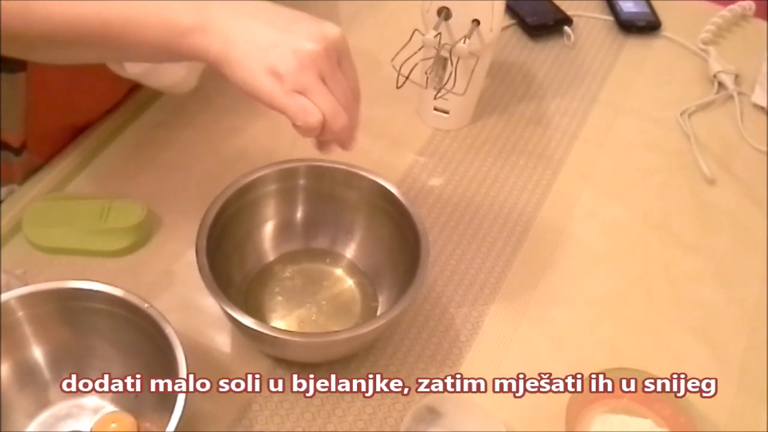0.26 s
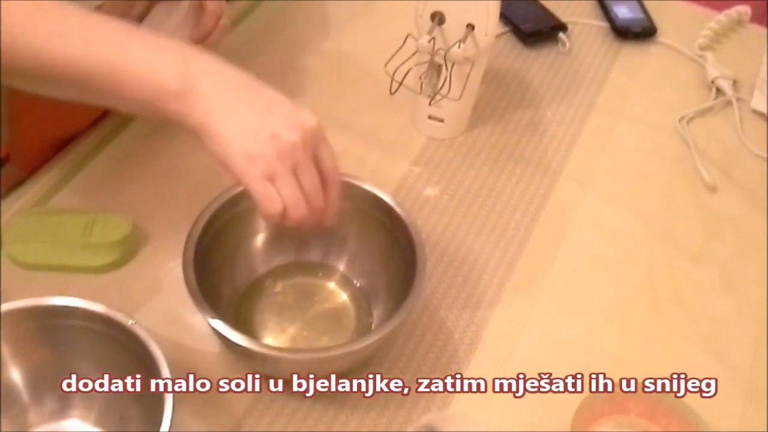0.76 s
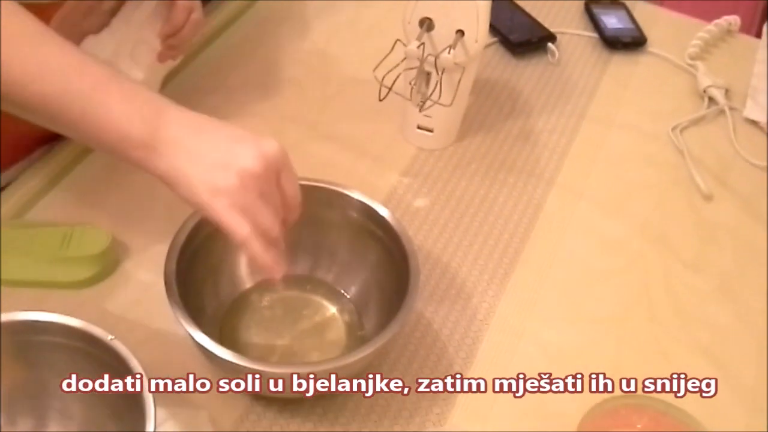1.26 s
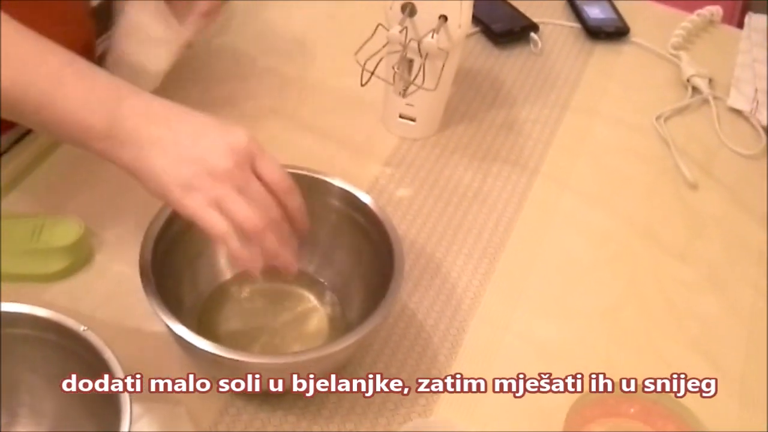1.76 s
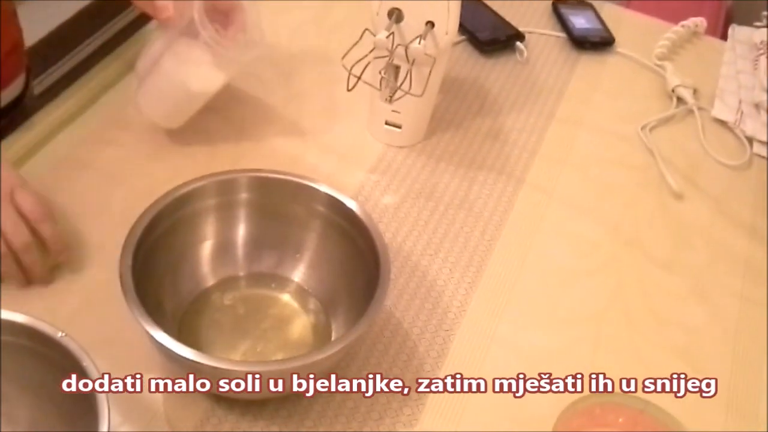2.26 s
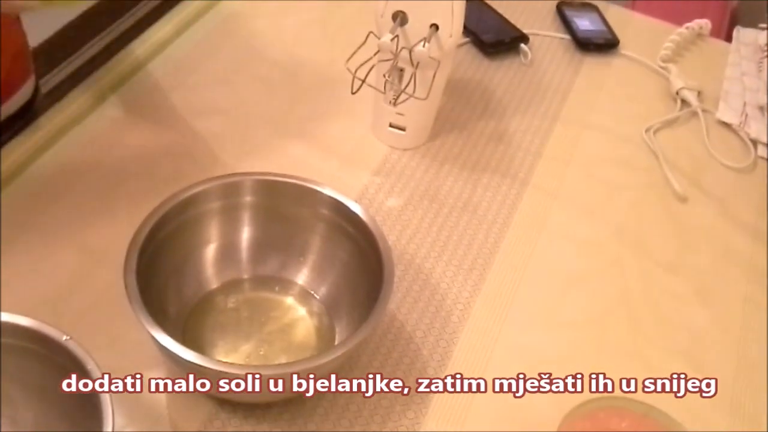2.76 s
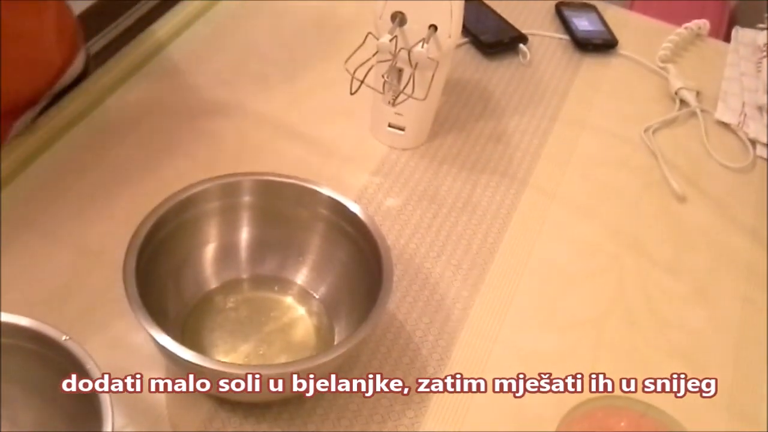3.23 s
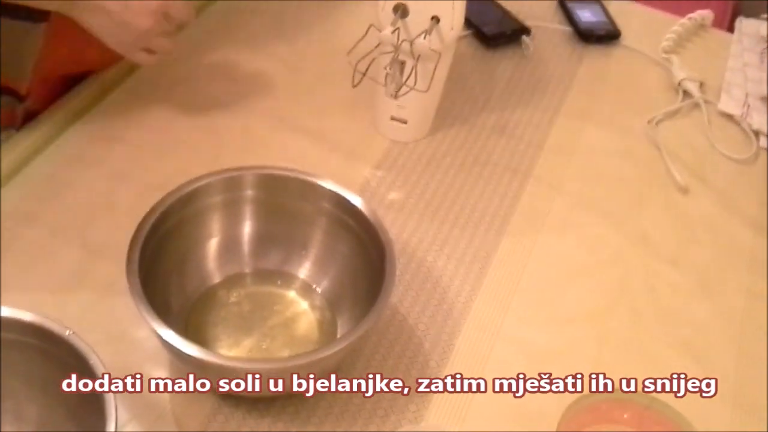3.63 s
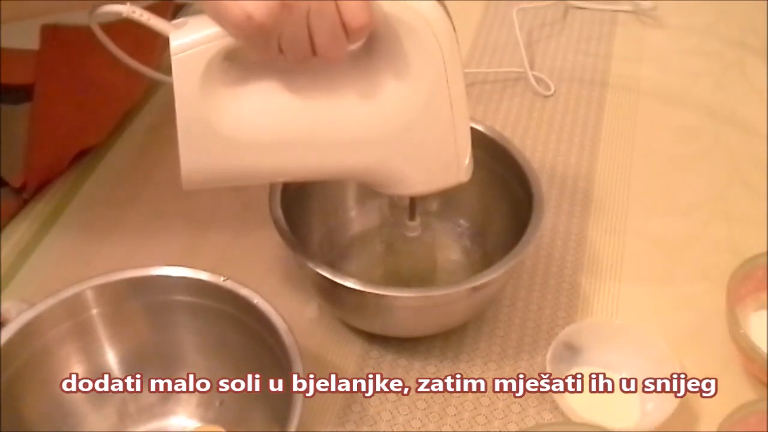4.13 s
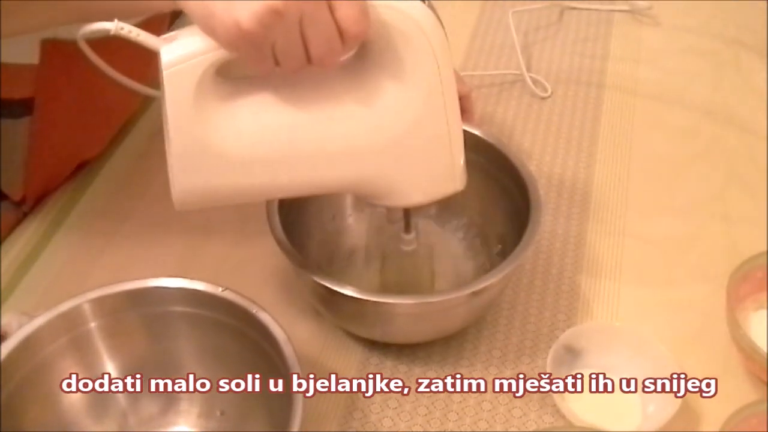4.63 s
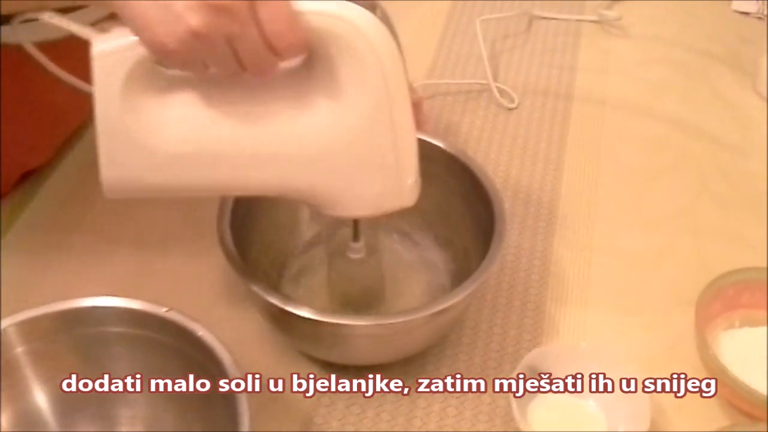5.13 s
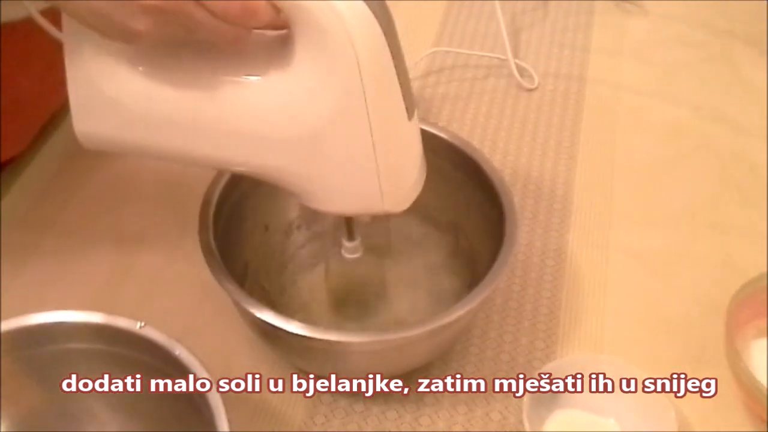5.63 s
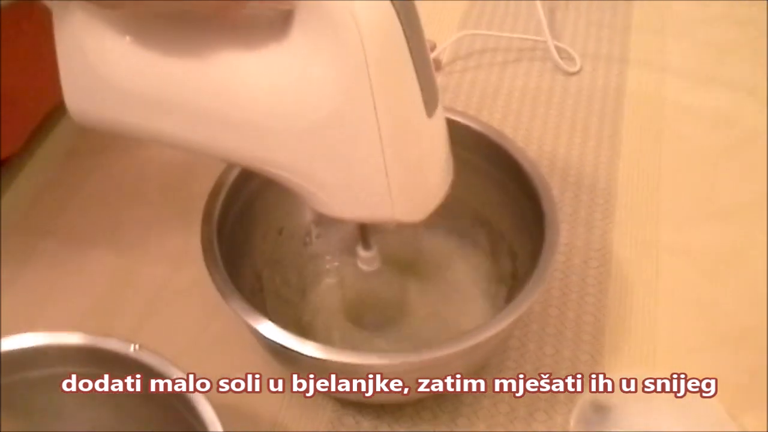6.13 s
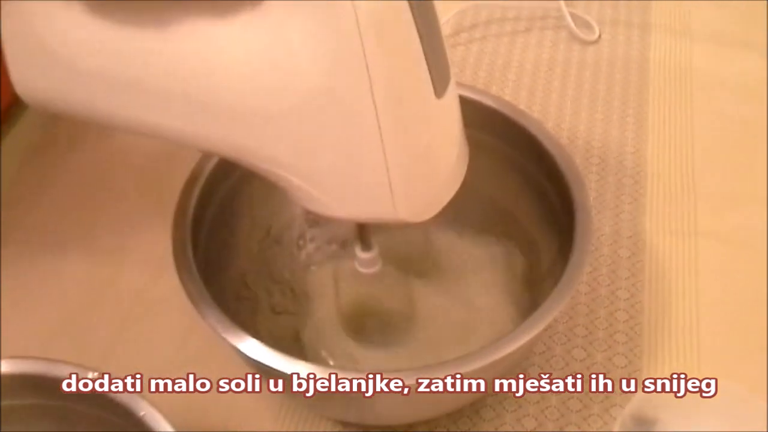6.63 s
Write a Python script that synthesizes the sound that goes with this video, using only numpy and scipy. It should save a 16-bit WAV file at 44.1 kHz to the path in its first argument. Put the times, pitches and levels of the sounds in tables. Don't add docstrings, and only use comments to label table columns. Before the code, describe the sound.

Faint crinkles and close creaking handling noise, then heavy knocks on a wooden table, abruptly cut to a hand mixer whirring in a steel bowl, speeding up.

```python
import sys
import numpy as np
from scipy import signal
from scipy.fft import rfft, irfft, next_fast_len
from scipy.io import wavfile
from scipy.ndimage import uniform_filter1d, map_coordinates

SR = 44100
rng = np.random.default_rng(int(sys.argv[2]) if len(sys.argv) > 2 else 0)


def wrap_up_sound(samples):
    columns = np.atleast_2d(samples).T
    tamed = np.clip(columns, -1, 1)
    steps = np.round(tamed * 32767).astype(np.int16)
    wavfile.write(sys.argv[1], SR, steps)


def voltage_ratio(level):
    return 10 ** (np.asarray(level, float) / 20)


N = 303408

# start_s, level_db
AIR_LEVEL = [(0, -73.5), (.9, -71.5), (1.1, -66.5), (2.1, -69), (2.6, -74.5), (3.3, -60), (3.55, -76.5),
             (3.72, -77.5)]
# pitch_hz, level_db (per Hz)
AIR_COLOUR = [(15, -37), (25, -4.5), (33, -47), (64, -24), (93, -9), (172, -6), (363, -2), (394, -6.5),
              (573, -1), (621, -2), (1860, -11), (2630, -11.5), (3930, -15), (6720, -12.5), (15000, -18.5)]
# pitch_hz, level_db (over the air)
APPLIANCES = [(100, -18), (2630, -18)]

# pitch_hz, level_db
COVERED_MIXER = [(60, 8), (110, 9.5), (200, 3), (380, -1), (690, -1), (1030, 3), (1400, 0), (1900, 0),
                 (2400, -5), (3100, -14), (4000, -18), (5000, -28), (6200, -34), (9000, -28), (14000, -32)]
# pitch_hz, level_db
COVERED_NEAR = [(60, -4), (110, -1), (200, 0.5), (380, 1), (690, -2.5), (1270, 6), (2350, -7),
                (4320, -23.5), (7960, -37), (14700, -10)]
# pitch_hz, level_db
COVERED_AIR = [(60, -30), (110, 4.5), (200, 6.5), (380, 1.5), (690, -1.5), (1270, 3.5), (2350, -5.5),
               (4320, -2.5), (7960, -7), (14700, -2)]
# pitch_hz, likeness (0-1)
PORT_LIKENESS = [(40, 0.081), (100, 0.23), (200, 1), (400, 1), (700, 0.077), (1500, 0.077), (3000, 0.21),
                 (6000, .2)]

# start_s, centre_hz, width (log ratio), fall_s (to -30 dB), level_db
PUFFS = [(.19, 6830, 0.29, 0.12, -60), (.3, 6800, 0.18, 0.082, -69), (.51, 7000, .3, 0.09, -72),
         (.622, 2750, 0.052, 0.13, -66.5), (.622, 3430, 0.047, 0.11, -67.5), (.622, 4150, 0.022, 0.12, -66),
         (.622, 4600, 0.027, 0.058, -64), (.76, 7500, 0.6, 0.064, -64), (.97, 7350, 0.35, 0.27, -60),
         (1.055, 8100, 0.19, 0.18, -56), (1.2, 6500, 0.53, 0.12, -56), (1.64, 6400, 0.86, 0.14, -59.5),
         (1.69, 8600, 0.11, 0.12, -58.5), (1.84, 7000, .15, 0.066, -59), (2.021, 6500, 0.51, 0.21, -51.5),
         (2.84, 470, 0.28, 0.23, -43), (2.32, 6500, 0.27, 0.11, -58), (2.32, 875, 0.54, 0.17, -59.5),
         (3.382, 8900, 0.93, 0.18, -54), (3.301, 161, 0.23, 0.29, -60.5), (3.915, 150, 0.28, .25, -58),
         (3.722, 190, 0.49, 0.15, -52)]
# top_s, level_db, rise_db_per_s, fall_db_per_s
RUSTLES = [
    (.4, -91, 4, 4),
    (1.11, -65, 90, 112),
    (2.12, -59, 19, 360),
    (3.27, -52.5, 40, 500),
]
# pitch_hz, level_db (per Hz)
CLOTH_COLOUR = [(880, -9), (1500, -5.5), (2060, -6.5), (3150, -8.5), (3890, -9), (4630, -8), (6680, -2.5),
                (13900, -26.5), (15000, -58)]

# pitch_hz, level_db
CASE_RESPONSE = [(60, -43), (120, -18.5), (200, -6.5), (350, -0.5), (690, 2.5), (1030, -6), (1400, -8),
                 (1900, -3), (2400, -5.5), (3100, -26), (4000, -16.5), (5000, -27.5), (7700, -26),
                 (12000, -47)]
# start_s, peak_db, brightness_db
HARD_SLIPS = [(1.0914, -38, -20), (1.1378, -29, -16), (1.1937, -26.5, -7), (1.3561, -27.5, -5.5),
              (1.4051, -21.5, -11), (1.4563, -22.5, -7), (1.539, -17, -8.5), (1.591, -18, -9),
              (1.7327, -17.5, -4.5), (1.7802, -18.5, -8), (1.9098, -21.5, -9.5), (1.9762, -21, -7),
              (2.0487, -24.5, -5.5)]
# start_s, peak_db
SOFT_SLIPS = [(.4039, -52.5), (0.487, -55), (0.5224, -49), (0.542, -53), (.6689, -51), (.6993, -50.5),
              (.7309, -51), (0.8484, -46), (0.8735, -44), (.9104, -42.5), (0.9834, -40), (.9929, -59),
              (1.0143, -34.5), (1.0533, -39), (1.0658, -38), (1.1001, -38.5), (1.1711, -36.5),
              (1.2029, -34.5), (1.3466, -32.5), (1.472, -31.5), (1.5108, -31.5), (1.5738, -29.5),
              (1.6461, -33), (1.685, -36.5), (1.7512, -33), (1.797, -34), (1.8385, -42), (1.935, -52),
              (1.9964, -40), (2.029, -49)]
# start_s, peak_db, brightness_db, tick_db
PRESS = (3.6034, -17, -17, -62)
# pitch_hz, level_db, t60_s
CASE_TICK = [(2300, -9, .005), (3200, -3, .003), (3800, 0, .003), (5100, -4, .003), (6500, -4, .003),
             (8600, -3, .003), (11000, -10, .003)]

# top_s, level_db, scrape_db (over level), rise_db_per_s, fall_db_per_s
SHOVES = [
    (2.27, -61, -12, 900, 60),
    (2.33, -64.5, 12.5, 195, 62),
    (2.462, -62.5, 5.5, 299, 115),
    (2.756, -50.5, 0, 700, 33),
    (2.85, -41, -10, 258, 244),
    (2.963, -41.5, -13, 284, 260),
    (3.056, -23, -8, 1206, 128),
    (3.19, -29, -11.5, 330, 146),
    (3.438, -55, 12, 103, 180),
]
# start_s, peak_db, t60_s
KNOCKS = [
    (2.757, -40, 0.53),
    (2.829, -34, 0.057),
    (2.958, -55, 0.44),
    (3.041, -22.5, 0.38),
    (3.067, -17.5, 0.18),
    (3.182, -19.5, 0.19),
]
# pitch_hz, level_db (per Hz)
WOOD_COLOUR = [(41, -42), (70, -41), (237, -3), (285, -26), (321, -4), (374, -27), (414, -6), (507, -6.5),
               (712, -10), (815, -13.5), (1690, -17), (1840, -17.5), (4000, -27), (5200, -27.5),
               (8800, -120)]
# pitch_hz, width_hz, level_db
TABLE_MODES = [(233, 9, -7), (430, 14, -2), (521, 16, -2), (582, 16, -3), (820, 50, 1), (1000, 80, -9),
               (1350, 60, 0), (1800, 90, -3), (2800, 150, -9)]

ORDERS = [1, 3, 5, 10, 10.8, 12, 24, 36, 48]
# slow_db, fast_db, swell_db, flutter (cycles)
ORDER_LEVELS = [(-68, -53, 1.5, 0), (-68, -62, 3, .03), (-68, -63, 3, .03), (-58, -48, 2, .07),
                (-68, -54, 2, .12), (-49, -61, 1.5, .18), (-54, -56, 2.5, .06), (-68, -82, 3, .1),
                (-57, -94, 1, .1)]
# pitch_hz, level_db (per Hz)
GEAR_COLOUR = [(35, -71), (60, -48), (202, -19), (239, -9.5), (287, -12), (339, -2), (420, -8.5),
               (464, -0.5), (765, -3), (1030, -1), (1620, -5), (2410, -7), (2660, -2.5), (3200, -25),
               (4160, -60), (7040, -120)]
# pitch_hz, level_db (per Hz)
AIR_SLOW = [(1300, -33), (2200, -1.5), (3000, -4.5), (3600, -6), (6000, -3), (7300, -3), (9200, -13),
            (11200, -20.5), (13000, -26), (15000, -58)]
# pitch_hz, level_db (per Hz)
AIR_FAST = [(1290, -47), (2200, -13.5), (2910, -9.5), (3340, 0), (3620, -5), (3950, -2.5), (4870, -6.5),
            (6300, -2), (9340, -13), (9800, -16), (13600, -21), (14300, -20), (15000, -59)]
# pitch_hz, width_hz, level_db
BOWL_MODES = [(454, 37, -11), (997, 17, -13), (1874, 115, 8.5), (2666, 28, 9.5), (2930, 150, 0.5),
              (4150, 50, 1)]
# start_s, peak_db
SLIDER_CLICKS = [
    (4.36, -27),
    (4.4007, -25.5),
    (4.495, -27.5),
]

CHANGE_S = 3.7205
START_HZ, SLOW_HZ, SETTLE_S = 242, 272.5, .944
BOOST_AT_S, FAST_HZ = 4.419, 392.5
SURGE_SHARE, SURGE_S, CREEP_S = .428, .396, .913
GEAR_DB, GEAR_CATCH_DB, AIR_DB, AIR_CATCH_DB = -46.5, 8, -47.5, 9.5
CATCH_S = 0.16
AIR_DB_PER_OCTAVE = 10.5
BUMP_S, BUMP_DB, BUMP_LENGTH_S = 3.935, 3.5, .03
SOFT_BRIGHT_DB, TICK_DB = -18, -14.5
GRIP_PATH, NEAR_PATH = .085, .03
LOOSE_UNTIL_S, LOOSE_BASS_DB = 1.25, 5
SCRAPE_QUICKER = 1.63
TOP_HZ = 14650


def unit(x):
    return x / np.sqrt(np.mean(x ** 2) + 1e-20)


def along(points, hz):
    f, v = np.transpose(points)
    return np.interp(np.log(hz + 1), np.log(f + 1), v)


def wobble(rate):
    return map_coordinates(rng.standard_normal(int(N * rate / SR) + 4), [np.arange(N) * rate / SR])


def filtered(x, response):
    m = next_fast_len(N + SR // 2)
    return irfft(rfft(x, m) * response(np.fft.rfftfreq(m, 1 / SR)), m)[..., :N]


def hiss(spectrum, patchy_db):
    z = signal.stft(rng.standard_normal((2, N + 512)), nperseg=512)[2]
    patches = uniform_filter1d(rng.standard_normal(z.shape[1:]), size=4, axis=0)
    patches = uniform_filter1d(patches, size=10, axis=1)
    pair = signal.istft(z * voltage_ratio(patchy_db * unit(patches)), nperseg=512)[1][:, :N]
    return unit(filtered(pair, lambda hz: voltage_ratio(along(spectrum, hz))))


def ringing(modes, gain):
    def response(f):
        resonances = sum(voltage_ratio(db) * 1j * f * w / (c * c - f * f + 1j * f * w) for c, w, db in modes)
        return 1 + gain * resonances
    return response


def swells(rows, quicker=1):
    s, db, rise, fall = np.transpose(rows)[..., None]
    late = np.arange(N) / SR - s
    slope = np.abs(np.where(late < 0, rise, fall))
    return np.max(db - quicker * np.abs(late) * slope, axis=0)


def ports(pair, balance, lag):
    def right(hz):
        return 2 / np.sqrt(1 + voltage_ratio(2 * along(balance, hz)))

    def left(hz):
        like = np.clip(along(PORT_LIKENESS, hz), 0, 1)
        shared = like * np.exp(-2j * np.pi * hz * lag)
        own = np.sqrt(1 - like ** 2)
        return right(hz) * voltage_ratio(along(balance, hz)) * np.array([shared, own])

    return np.array([filtered(pair, left).sum(axis=0), filtered(pair[0], right)])


def kitchen_air():
    t = np.arange(N) / SR
    tones = sum(voltage_ratio(db + 3.3 * wobble(24.7)) * np.sin(2 * np.pi * hz * t) for hz, db in APPLIANCES)
    level_db = np.interp(t, *np.transpose(AIR_LEVEL))
    air = voltage_ratio(level_db + 3) * (hiss(AIR_COLOUR, patchy_db=.8) + tones)
    return ports(air, COVERED_AIR, lag=.0005)


def crinkles():
    out, t = np.zeros((2, N)), np.arange(8192) / SR
    hz = np.fft.rfftfreq(len(t), 1 / SR)
    for s, centre_hz, width, fall_s, db in PUFFS:
        band = np.exp(-(np.log((hz + 1) / centre_hz) / width) ** 2)
        puff = unit(irfft(rfft(rng.standard_normal((2, len(t)))) * band))
        envelope = voltage_ratio(db - 30 * t / fall_s) * (1 - np.exp(-t / 0.0017))
        out[:, round(s * SR):][:, :len(t)] += envelope * puff
    return out


def salt_and_bag():
    before_change = np.arange(N) / SR < CHANGE_S
    level_db = swells(RUSTLES) - 2 + 1.5 * wobble(40)
    rustle = voltage_ratio(level_db) * hiss(CLOTH_COLOUR, patchy_db=1.5) * before_change
    return ports(rustle + crinkles(), COVERED_NEAR, lag=.00055)


def case_wave(s, bright_db, path):
    hz = np.fft.rfftfreq(4096, 1 / SR)
    phase, late, later = rng.random(3)
    tilt_db = (bright_db + 4.5) * np.clip(np.log2((hz + 1) / 900), 0, 1.3)
    tilt_db += 260 * max(.065 - path, 0) * np.clip(np.log2(450 / (hz + 1)), 0, 2.5)
    tilt_db += LOOSE_BASS_DB * (s < LOOSE_UNTIL_S) * np.clip(np.log2(500 / (hz + 1)), 0, 1.5)
    travel = np.exp(-4j * np.pi * path * np.sqrt(hz) + 1j * (0.06 + phase))
    dull = 1 / (1 + (hz / 600) ** 4)
    first_echo = .3 * np.exp(-2j * np.pi * hz * (.002 + .002 * late))
    second_echo = .15 * np.exp(-2j * np.pi * hz * (.005 + .004 * later))
    edges = 1 + dull * (first_echo - second_echo)
    wave = np.roll(irfft(voltage_ratio(along(CASE_RESPONSE, hz) + tilt_db) * travel * edges), 1024)
    return wave / np.abs(signal.hilbert(wave)).max()


def creaks():
    out, t = np.zeros((2, N)), np.arange(600) / SR
    slips = [(s, db, bright_db, db + TICK_DB, GRIP_PATH) for s, db, bright_db in HARD_SLIPS]
    slips += [(*PRESS, NEAR_PATH)]
    slips += [(s, db, SOFT_BRIGHT_DB, -120, GRIP_PATH) for s, db in SOFT_SLIPS]
    for s, db, bright_db, tick_db, path in slips:
        wave = case_wave(s, bright_db, path)
        start = round((s - path / np.sqrt(800)) * SR) - 1024
        out[0, start:start + len(wave)] += voltage_ratio(db + 1.5) * wave
        tick = np.zeros(len(t))
        for pitch_hz, level_db, t60 in CASE_TICK:
            decay = voltage_ratio(level_db + rng.normal(0, 1.5) - 60 * t / t60)
            tick += decay * np.sin(2 * np.pi * (pitch_hz * t + rng.random()))
        tick *= 1 - np.exp(-t / 0.00019)
        out[1, round((s - .0027) * SR):][:len(t)] += voltage_ratio(tick_db + 8.5) * tick
    return out


def table():
    shove_db = swells([(s, db, rise, fall) for s, db, _, rise, fall in SHOVES])
    scrape_rows = [(s, db + over_db, rise, fall) for s, db, over_db, rise, fall in SHOVES]
    scrape_db = swells(scrape_rows, SCRAPE_QUICKER)
    wood = hiss(WOOD_COLOUR, patchy_db=1)
    drive = voltage_ratio(np.minimum(shove_db, -44) - 13.0 + 1.6 * wobble(60))
    t = np.arange(SR // 3) / SR
    for s, db, t60 in KNOCKS:
        ring = voltage_ratio(db - 14.5 - 60 * t / t60)
        contact = voltage_ratio(db - 15.0 - 60 * t / 0.012)
        drive[round((s + .001) * SR):][:len(t)] += ring + contact
    modes = ringing(TABLE_MODES, gain=2.5)
    body = filtered(drive * wood, lambda hz: modes(hz) / (1 + (120 / (hz + 1)) ** 4))
    scrape = voltage_ratio(scrape_db - 7.5) * hiss(CLOTH_COLOUR, patchy_db=0.5)
    return ports(body + scrape, COVERED_NEAR, lag=0.00045)


def shaft():
    t = np.arange(N) / SR
    slow = SLOW_HZ - (SLOW_HZ - START_HZ) * np.exp(-np.maximum(t - CHANGE_S, 0) / SETTLE_S)
    boosted = np.maximum(t - BOOST_AT_S, 0)
    missing = SURGE_SHARE * np.exp(-(boosted / SURGE_S) ** 2)
    missing += (1 - SURGE_SHARE) * np.exp(-boosted / CREEP_S)
    return FAST_HZ - (FAST_HZ - slow) * missing


def shaft_orders(turns, fast, since_change):
    catch_db = 7 * np.exp(-np.abs(since_change) / 0.21)
    catch_db -= 5 * np.exp(-((since_change - .85) / .13) ** 2)
    tones = np.zeros((2, N))
    for order, (slow_db, fast_db, swell_db, flutter) in zip(ORDERS, ORDER_LEVELS):
        swell = wobble(7) + .8 * np.array([wobble(25), wobble(25)])
        level_db = slow_db + (fast_db - slow_db) * fast + catch_db + swell_db * swell
        cycles = order * turns + flutter * wobble(300) + rng.random((2, 1))
        tones += voltage_ratio(level_db) * np.sin(2 * np.pi * cycles)
    return tones


def slider():
    out, t = np.zeros((2, N)), np.arange(2000) / SR
    for s, db in SLIDER_CLICKS:
        grit = rng.standard_normal((2, len(t) + 3))
        snap = grit[:, 3:] - .6 * grit[:, :-3]
        out[:, round(s * SR):][:, :len(t)] += voltage_ratio(db - 13 - 60 * t / 0.057) * snap
    return out


def mixer():
    shaft_hz, since_change = shaft(), np.arange(N) / SR - CHANGE_S
    excess = np.exp(-np.abs(since_change) / CATCH_S)
    bump_db = BUMP_DB * np.exp(-((since_change + CHANGE_S - BUMP_S) / BUMP_LENGTH_S) ** 2)
    gear_db = GEAR_DB + GEAR_CATCH_DB * excess + bump_db
    air_db = AIR_DB + AIR_CATCH_DB * excess + bump_db
    air_db += AIR_DB_PER_OCTAVE * np.log2(shaft_hz / START_HZ)
    turns = np.cumsum(shaft_hz * (1 + .0013 * wobble(40))) / SR
    fast = np.clip((shaft_hz - 260) / 110, 0, 1)
    air = np.sqrt(1 - fast) * hiss(AIR_SLOW, patchy_db=.8)
    air += np.sqrt(fast) * hiss(AIR_FAST, patchy_db=1.3)
    beat = 1 + 0.083 * np.cos(2 * np.pi * turns) + 0.07 * wobble(90)
    slosh = voltage_ratio(0.29 * wobble(25))
    noise = voltage_ratio(air_db - 1.0) * beat * air
    noise += voltage_ratio(gear_db - 2) * slosh * hiss(GEAR_COLOUR, patchy_db=1.0)
    in_bowl = filtered(noise, ringing(BOWL_MODES, gain=0.37))
    sound = shaft_orders(turns, fast, since_change) + in_bowl + slider()
    return ports(sound * (since_change > 0), COVERED_MIXER, lag=0.000496)


def scene():
    return kitchen_air() + salt_and_bag() + creaks() + table() + mixer()


def roll_off(x):
    return signal.sosfilt(signal.butter(12, 15270, fs=SR, output="sos"), x)


def record(dry):
    held = dry / (1 + np.abs(dry / .2) ** 5) ** (1 / 5)
    mix = filtered(held, lambda hz: hz < TOP_HZ)
    return roll_off(mix)


dry = scene()
out = record(dry)
wrap_up_sound(out)
```